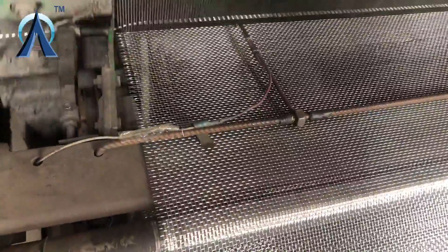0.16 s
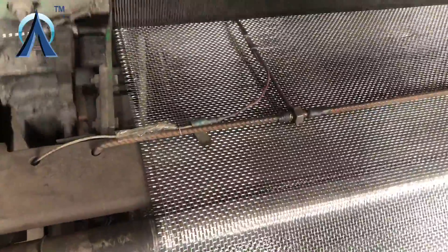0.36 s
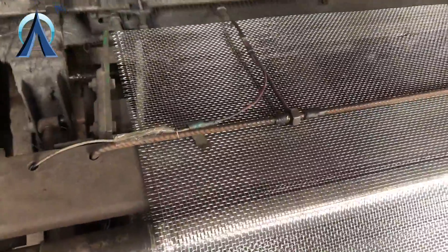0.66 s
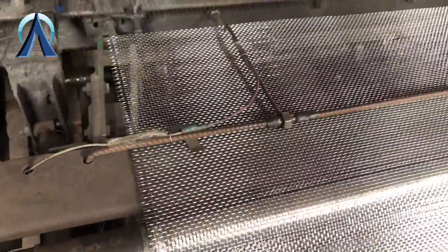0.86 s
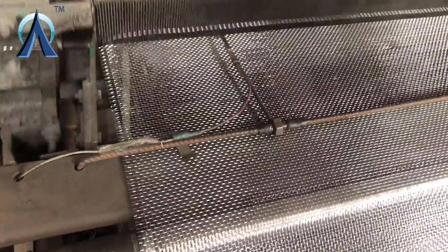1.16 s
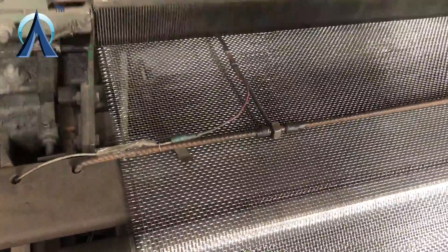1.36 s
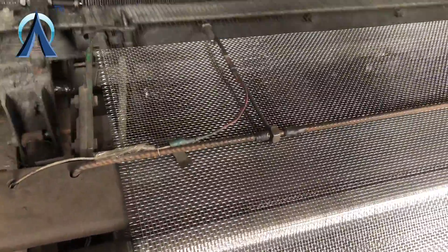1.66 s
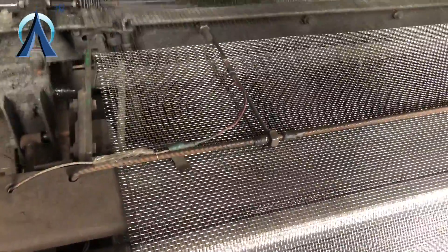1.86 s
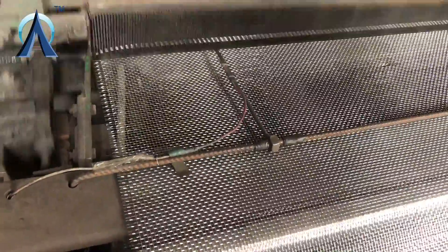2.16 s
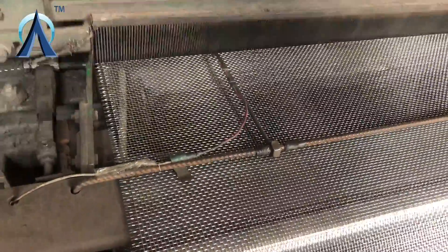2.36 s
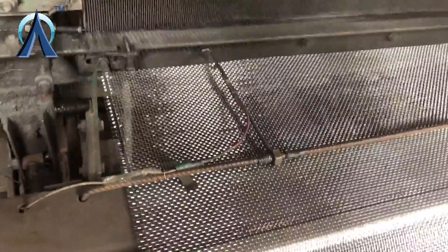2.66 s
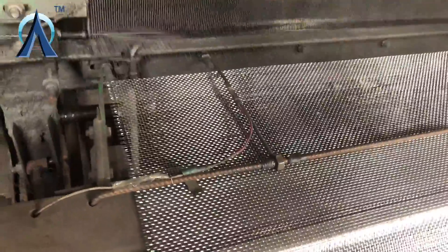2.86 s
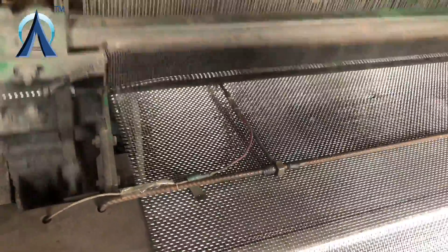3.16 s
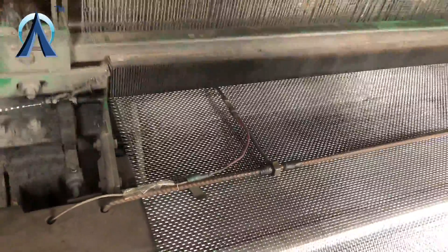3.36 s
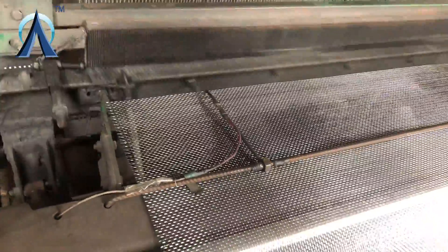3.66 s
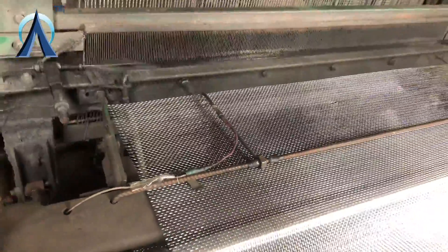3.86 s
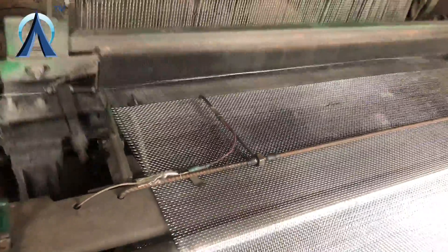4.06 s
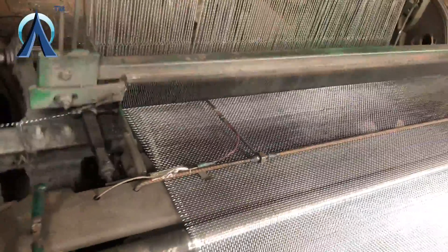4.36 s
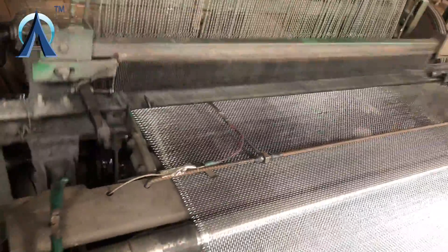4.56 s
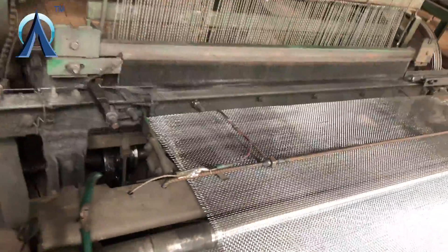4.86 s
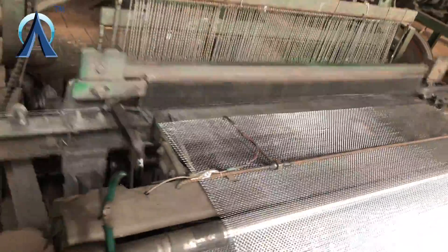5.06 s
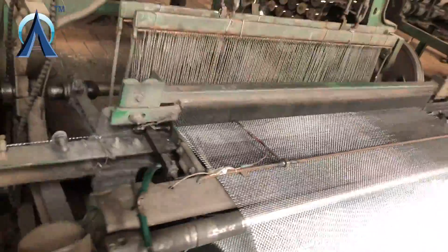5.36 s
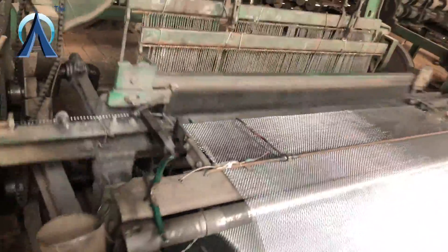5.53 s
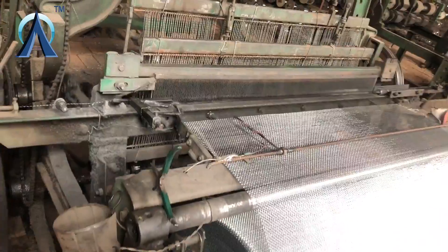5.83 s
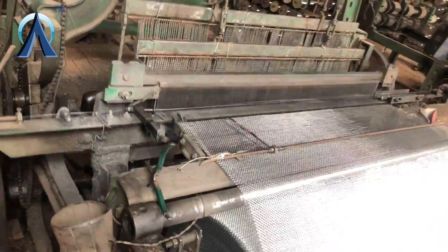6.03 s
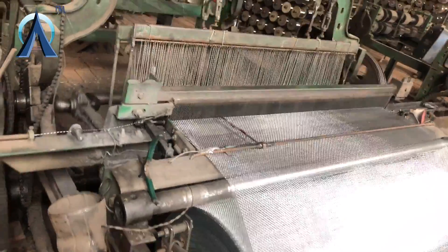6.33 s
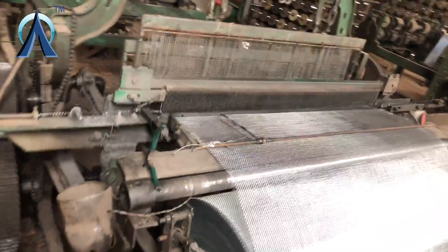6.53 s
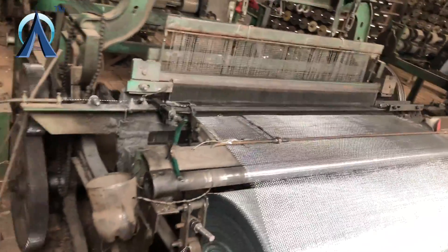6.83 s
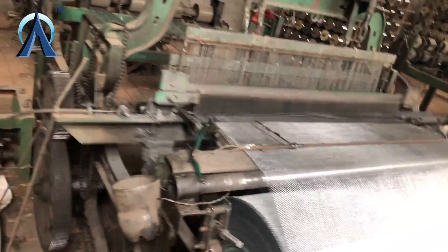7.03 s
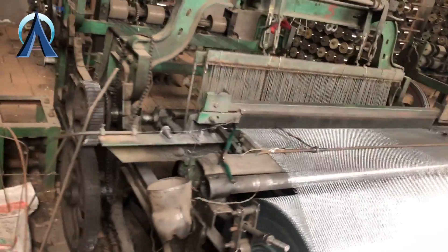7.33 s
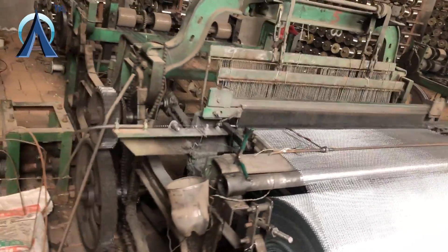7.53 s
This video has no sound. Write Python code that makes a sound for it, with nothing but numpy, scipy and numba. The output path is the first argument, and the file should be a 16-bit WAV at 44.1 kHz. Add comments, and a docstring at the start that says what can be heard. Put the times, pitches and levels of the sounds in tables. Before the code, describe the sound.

Sharp metallic clacks, chirps and a knocking beat repeat each second above gear rattle and wire rustle, softening as the microphone draws back.

```python
"""Wire mesh loom at close range

In a workshop of rumbling machines, a loom weaves about one pick a second in front of the microphone.
Decaying modes make the reed beat and small steel rings; shaped noise makes the clacks of the linkage.
Random ticks and noise make gear rattle and wire rustle; unsteady tones and pulses chirp and scrape.
The microphone moves back from the cloth, and a fast limiter ducks under the sharpest hits."""
import sys
import numpy as np
from scipy import signal
from scipy.fft import rfft, irfft
from scipy.io import wavfile
from scipy.ndimage import uniform_filter1d
from numba import njit

SR = 44100
rng = np.random.default_rng(int(sys.argv[2]) if len(sys.argv) > 2 else 0)


def store_pcm(level_fs):
    """Save levels as 16-bit WAV."""
    pcm = np.round(np.clip(level_fs, -1, 1) * 32767).astype(np.int16)
    wavfile.write(sys.argv[1], SR, np.atleast_2d(pcm).T)


N = 339129
T = np.arange(N) / SR
TURN_S, FIRST_TURN_S = 1.01, 0.2505


def undb(db):
    """Decibels to amplitude gain."""
    return 10 ** (np.asarray(db) / 20)


def unit(x):
    """Scale to rms 1."""
    return x / np.sqrt(np.mean(x ** 2) + 1e-18)


def fade(t, t60):
    """Free decay, 60 dB down after t60 seconds (at least 4 ms)."""
    return np.exp(-np.log(1000) * t / np.maximum(t60, 0.004))


def add(out, s, sound):
    """Mix a sound in at time s."""
    i = max(int(s * SR), 0)
    out[i:i + len(sound)] += sound[:max(N - i, 0)]


def walk(rate):
    """Smooth random curve of spread 1, with about `rate` new values a second."""
    k = max(int(SR / rate), 2)
    steps = np.repeat(rng.standard_normal(N // k + 1), k)
    return unit(uniform_filter1d(steps, k)[:N])


def colour(x, points):
    """Causal (minimum-phase) filter with the given outline of (pitch_hz, level_db)."""
    size = 4096
    hz, db = np.transpose(points)
    outline = np.interp(np.log(np.fft.rfftfreq(size, 1 / SR) + 1), np.log(hz), db)
    # folding the cepstrum onto positive time makes the filter causal
    cepstrum = irfft(np.log(undb(outline)))
    cepstrum[1:size // 2] *= 2
    cepstrum[size // 2 + 1:] = 0
    impulse = irfft(np.exp(rfft(cepstrum)))
    return signal.fftconvolve(x, impulse)[:len(x)]


def ring(modes, length, detune):
    """Sum of decaying modes (pitch_hz, level_db, t60_s), each slightly detuned at every blow."""
    t = T[:int(length * SR)]
    out = np.zeros(len(t))
    for hz, db, t60 in modes:
        pitch = hz * (1 + detune * rng.standard_normal())
        out += undb(db) * fade(t, t60) * np.sin(2 * np.pi * pitch * t)
    return out


def struck(blows, modes, gain_db, detune):
    """One object rung by a list of blows (start_s, level_db)."""
    out = np.zeros(N)
    for s, db in blows:
        add(out, s, undb(db + gain_db) * ring(modes, length=1 / 2, detune=detune))
    return out


def steel(low_hz, high_hz, t60, length, count):
    """Ring of a small steel part: modes scattered over a band, a few of them strong."""
    t = T[:int(length * SR)]
    hz = rng.uniform(low_hz, high_hz, (count, 1))
    phase = rng.uniform(0, 2 * np.pi, (count, 1))
    strength = unit(rng.exponential(size=(count, 1)))
    modes = strength * np.sin(2 * np.pi * hz * t + phase)
    return np.sqrt(2 / count) * modes.sum(axis=0) * fade(t, t60)


def rattle(rate, spread_db, low_hz, high_hz, t60, count):
    """Many loose parts, each ticking at random with its own ring; `rate` is all ticks per second."""
    out = np.zeros(N)
    for _ in range(count):
        part = steel(low_hz, high_hz, t60, length=1 / 20, count=24)
        when, size = rng.random(size=(4000, 2))[:int(rate * N / SR / count)].T
        strength = undb(-spread_db * np.log(size + 0.019))  # a few ticks are strong
        taps = np.bincount((when * N).astype(int), strength, N)
        out += signal.oaconvolve(taps, part)[:N]
    return unit(out)


def turn_start(k):
    """Time at which turn k begins."""
    return FIRST_TURN_S + k * TURN_S


def every_turn(rows):
    """Repeat the rows of one turn, from the part-turn already under way at the start."""
    repeats = [(turn_start(k) + lag, *rest) for k in range(-1, len(TURNS)) for lag, *rest in rows]
    return [row for row in repeats if 0 <= row[0] < N / SR]


def cyclic(points):
    """The columns of a one-turn curve, repeated through time."""
    lag, *columns = np.transpose(points)
    return [np.interp(T - FIRST_TURN_S, lag, column, period=TURN_S) for column in columns]


# microphone distance from the cloth: start_s [s], distance [0 close to 1 far]
DISTANCE = [(0, 0.078), (3.2, 0.084), (4.4, 0.27), (5.6, 0.4), (7.69, 1)]


def afar(s):
    """How far the microphone has moved back at time s, 0 to 1."""
    return np.clip(np.interp(s, *np.transpose(DISTANCE)), 0, 1)


# spectrum of the other machines: pitch_hz [Hz], level_db [relative dB per Hz]
SHOP_SPECTRUM = [(13, -28), (22, -22), (69, -6.5), (204, -1), (252, -4.5), (322, 2.5), (380, 1), (591, 0),
                 (652, 0.5), (743, 1), (875, -4.5), (1100, -3.5), (1430, -45), (2420, -120)]


def workshop():
    """Other machines: coloured noise and dull random ticks, swelling a little."""
    clatter = rattle(rate=260, spread_db=4.5, low_hz=156.0, high_hz=1274, t60=0.059, count=16)
    rumble = colour(rng.standard_normal(N) + undb(-13.5) * clatter, SHOP_SPECTRUM)
    return unit(rumble) * undb(-34.85 + 0.43 * walk(7.4))


# steady drive tones: pitch_hz [Hz, mean], level_db [dB, mean]
DRIVE_TONES = [(700, -53), (764, -57.5)]


def drive_whine():
    """Faint whine of drives: sine tones with a slight waver in pitch and strength."""
    out = np.zeros(N)
    for hz, db in DRIVE_TONES:
        pitch = hz * (1 + 0.00398 * walk(13))
        tone = unit(np.sin(2 * np.pi * np.cumsum(pitch) / SR))
        out += undb(db + 2 * walk(5.6)) * tone
    return out


# gear load through one turn: start_s [s into the turn], level_db [relative dB]
GEAR_LOAD = [(.012, -27), (.06, -31), (.14, -27.5), (.22, -27.5), (.31, -29), (.40, -30.5), (.49, -27),
             (.55, -31), (.572, -24), (.592, -30), (.66, -27.5), (.77, -29), (.89, -29.5), (.94, -29),
             (.985, -29)]
# slow change of the rattle: start_s [s], level_db [dB change]
GEAR_SWELL = [(0, -2.5), (.6, 1.5), (1.05, -1.5), (1.6, .5), (2.1, -2), (2.7, 0.2), (3.5, 0), (4.2, -0.5),
              (5.1, 1), (5.9, -1), (6.6, 0), (7.69, -1)]
# spectrum of the gearing: pitch_hz [Hz], level_db [relative dB per Hz]
GEAR_SPECTRUM = [(400, -24.5), (750, -8.5), (1000, -6.5), (1250, -2), (1500, -2.5), (1850, -0.5),
                 (2500, -2.5), (3200, -9.5), (5000, -30.5)]


def gearing():
    """Gears rattle with the load: many ringing ticks and noise, swelling through each turn."""
    level = cyclic(GEAR_LOAD)[0] + np.interp(T, *np.transpose(GEAR_SWELL)) + 0.64 * walk(20)
    ticks = rattle(rate=380, spread_db=1, low_hz=399.7, high_hz=4493, t60=0.1, count=40)
    gears = ticks + 0.87 * rng.standard_normal(N)
    return unit(colour(gears, GEAR_SPECTRUM)) * undb(level + 1.0)


# wire rub through one turn: start_s [s into the turn], rustle_db, hiss_close_db, hiss_afar_db [relative dB]
WARP_RUB = [(.02, -25, -30, -28.5), (.10, -30.5, -31, -35), (.15, -28, -27.5, -39), (.235, -28, -31.5, -33),
            (.29, -25, -23.5, -32), (.34, -27.5, -30.5, -31.5), (.41, -30, -31.5, -28),
            (.465, -27, -27, -28), (.555, -31, -33, -31.5), (.59, -28, -24.5, -34),
            (.65, -28.5, -30, -27.5), (.72, -29.5, -28.5, -30.5), (.79, -28, -26, -29.5),
            (.895, -30, -28, -32.5), (.93, -23.5, -19.5, -24.5), (.985, -27, -32, -24.5)]
# spectra of the two layers: pitch_hz [Hz], level_db [relative dB per Hz]
RUSTLE_SPECTRUM = [(1500, -0.5), (2500, -4), (3200, 0), (4200, 1.5), (5200, -1), (6700, -1), (8200, -10),
                   (11000, -28.5)]
HISS_SPECTRUM = [(5500, -23), (7500, -0.5), (8700, -0.5), (9500, 3.5), (10600, 2.5), (11700, 2), (13000, 2),
                 (14200, 3), (15300, 3.5), (16000, 3.5)]


def warp_wires():
    """Steel warp wires rub as the shed opens and closes: ringing ticks and noise, coloured twice."""
    rustle, hiss_close, hiss_far = cyclic(WARP_RUB)
    hiss = hiss_close + (hiss_far - hiss_close) * afar(T)
    tension = 1.4 * walk(14)  # no two turns pull the wires alike
    jostle = walk(120)  # the wires catch and slip together
    ticks = rattle(rate=750, spread_db=3.5, low_hz=1806, high_hz=15860, t60=0.065, count=64)
    wires = ticks + 0.99 * rng.standard_normal(N)
    rustle_gain = undb(rustle + tension + 0.79 * jostle)
    hiss_gain = undb(hiss + tension + 2.0 + 0.68 * jostle + 0.2 * walk(180))
    return unit(colour(wires, RUSTLE_SPECTRUM)) * rustle_gain + unit(colour(wires, HISS_SPECTRUM)) * hiss_gain


# loose rods and wire ends: start_s [s], pitch_hz [Hz], level_db [relative dB], t60_s [s]
ROD_TINKLES = [(.535, 3649, -25, .2), (1.99, 9900, -29, .21), (2.02, 7330, -27.5, .2),
               (2.66, 2760, -26, 0.16), (3.549, 2400, -29, 0.17), (3.755, 2780, -28, .26),
               (4.04, 5700, -30, .16), (4.04, 8850, -26, 0.13), (4.47, 2920, -25.5, 0.25),
               (5.94, 2780, -25, .11), (6.001, 2820, -25, .1), (6.052, 2770, -27, .12),
               (6.115, 2804, -25, .084), (6.465, 2347, -30, .2), (6.785, 6370, -24, .15),
               (6.908, 2804, -21, 0.46), (7.18, 2756, -28, 0.13)]


def tinkles():
    """Each thin rod or wire end rings with one decaying mode."""
    out = np.zeros(N)
    for s, hz, db, t60 in ROD_TINKLES:
        add(out, s, ring([(hz, db + 2.0, t60)], length=1 / 2, detune=0.00019))
    return out


# a flicked wire end: start_s [s], level_db [relative dB]
WIRE_FLICKS = [(3.330, -16)]
# its modes: pitch_hz [Hz], level_db [relative dB], t60_s [s]
WIRE_END_MODES = [(3750, -4.5, 0.088), (6420, -2, 0.069), (6965, -9, .08), (9990, -4.5, 0.13),
                  (10841, -13, .08), (14850, -2, .14), (15600, -9, .1)]


def wire_flicks():
    """A flicked wire end rings in its own modes."""
    return struck(WIRE_FLICKS, WIRE_END_MODES, gain_db=2.5, detune=0.0003)


# blows on a steel bar: start_s [s], level_db [relative dB]
BAR_BLOWS = [(5.501, -10), (6.465, -43)]
# its modes: pitch_hz [Hz], level_db [relative dB], t60_s [s]
BAR_MODES = [(1800, -11, 0.18), (2255, -22, 0.16), (2347, 1.5, 0.39), (2230, -22, .25), (2890, -8, 0.11),
             (3630, -11, .22)]


def bar_clangs():
    """A struck steel bar rings in its own modes."""
    return struck(BAR_BLOWS, BAR_MODES, gain_db=-2.5, detune=0.0003)


# chirp and scrape, turn by turn (scrapes() reads it too):
# chirp_db [relative dB], scrape_start_s [s into the turn], scrape_length_s [s], scrape_db [relative dB]
TURNS = [(-14.5, .045, 0.19, -21), (-15.5, .12, 0.032, -22), (-15, .122, 0.076, -19), (-45, 0.14, .05, -30),
         (-21, .072, 0.021, -16.5), (-27, 0.04, 0.035, -19), (-23.5, 0.14, .05, -35), (-25, 0.13, .05, -39)]
# a dry bearing chirps twice after the beat:
# start_s [s into the turn], length_s [s], pitch_hz [Hz, mean], level_db [relative dB]
BEARING_CHIRPS = [(0.038, 0.023, 7970, -2), (0.054, .017, 7240, -9)]
# wire sings in its guides: start_s [s], length_s [s], pitch_hz [Hz, mean], level_db [relative dB]
WIRE_SINGING = [(1.385, .07, 13300, -32), (2.630, .14, 12200, -29), (3.645, .029, 12015, -25),
                (3.740, 0.16, 11778, -31), (4.945, .1, 11700, -27), (5.950, .42, 12000, -39),
                (7.290, 0.16, 11800, -29)]


def squeaks():
    """Bearing and wire guides: short stick-slip tones with an unsteady pitch and strength."""
    out, drift, grip = np.zeros(N), walk(330), undb(3.5 * walk(300))
    tones = list(WIRE_SINGING)
    for k, (chirp_db, *_) in enumerate(TURNS):
        for lag, length, hz, db in BEARING_CHIRPS:
            tones.append((turn_start(k) + lag, length, hz, chirp_db + db))
    for s, length, hz, db in tones:
        span = slice(int(s * SR), min(int((s + length) * SR), N))
        tone = np.sin(2 * np.pi * np.cumsum(hz * (1 + 0.0074 * drift[span])) / SR)
        shape = grip[span] * signal.windows.tukey(len(tone), 0.6)
        add(out, s, undb(db - 4.0) * unit(tone * shape))
    return out


# a small latch snaps with four of the strokes: start_s [s into the turn], level_db [relative dB, close]
LATCH_SNAPS = [(.003, -13), (.204, -17), (.584, -3), (.679, -11)]
# its modes: pitch_hz [Hz], level_db [relative dB], t60_s [s]
LATCH_MODES = [(3730, -29, .05), (4020, -43, .04), (11400, -5.5, 0.027), (11720, -20, .04),
               (14600, -20, .06)]


def latch():
    """A small latch rings in its own modes and is soon lost as the microphone moves back."""
    snaps = [(s, db - 31 * afar(s)) for s, db in every_turn(LATCH_SNAPS)]
    return struck(snaps, LATCH_MODES, gain_db=7.0, detune=0.0026)


def scrapes():
    """As the reed draws back, uneven stick-slip pulses ring a narrow resonance of the slide."""
    out = np.zeros(N)
    slide_hz, slips_hz, t60 = 1776, 259, 0.01
    modes = [(slide_hz, 0, t60), (2.06 * slide_hz, -7, t60)]
    for k, (_, lag, length, db) in enumerate(TURNS):
        n = int(length * SR)
        phase = np.cumsum(slips_hz * undb(5.3 * walk(200)[:n])) / SR
        slips = np.diff(np.floor(phase), prepend=0) * signal.windows.tukey(n, 0.4)  # one pulse a cycle
        sound = signal.fftconvolve(slips, ring(modes, length=1 / 20, detune=0.0041))
        add(out, turn_start(k) + lag, undb(db - 6.5) * sound / (np.std(sound[:n]) + 1e-9))
    return out


# linkage blows, same order every turn: start_s [s into the turn], body_db, edge_db, sizzle_db [relative dB],
# pitch_hz [Hz, ring], ring_db [relative dB], afar_db [dB change at the far position]
LINKAGE_STROKES = [(.001, -19, -22, -15, 4030, -29, -17), (.2012, -18, -22.5, -22.5, 3920, -24.5, -5),
                   (.2585, -27, -15.5, -20.5, 4570, -21.5, -15),
                   (.3155, -21, -21, -18.5, 2480, -26.5, -7.5), (.3635, -36, -27, -19.5, 9660, -28.5, -6),
                   (.568, -24, -21.5, -16, 2070, -35, -2.5), (.5835, -26, -23.5, -11.5, 6480, -21, -4),
                   (.596, -47, -19.5, -15.5, 10900, -24, -16), (.677, -22, -22.5, -27, 3900, -30, -6),
                   (.707, -28, -27.5, -29.5, 2830, -27.5, -1.5), (.91, -21, -17.5, -13, 9400, -20, -5),
                   (.94, -22.5, -23, -19.5, 2500, -32, 2)]
# a part with play knocks hard, on a stroke or between two: start_s [s], level_db [relative dB], pitch_hz [Hz]
HARD_KNOCKS = [(1.543, -17, 2070), (1.575, -18, 6300), (1.963, -26, 2880), (2.435, -24, 2670),
               (2.527, -27, 4660), (2.984, -26, 2820), (3.018, -21, 2640), (3.329, -24, 14740),
               (4.222, -17, 2430), (4.458, -23.5, 3650), (4.565, -18, 10780), (5.213, -28, 2080),
               (5.503, -29, 2410), (5.569, -27.5, 2440), (5.967, -24, 3950), (6.001, -30, 2850),
               (6.139, -24, 2400), (6.57, -23.5, 4580), (6.21, -18, 4020), (7.648, -9, 3890)]
# colour of the knocks: body_db, edge_db, sizzle_db, ring_db [dB added to the knock level]
KNOCK_BALANCE = (3, -3.5, -3.5, -6)


def linkage():
    """Steel blows as (s, Hz, four levels): strokes, never quite alike, and the hard knocks."""
    play_s, force_scatter_db, ring_scatter = 0.0006, 1.1, 0.0045
    blows = []
    for s, body, edge, sizzle, hz, db, afar_db in every_turn(LINKAGE_STROKES):
        late, force, detune = rng.standard_normal(3)
        levels = np.array([body, edge, sizzle, db]) + afar_db * afar(s) + force_scatter_db * force
        blows.append((s + play_s * late, hz * (1 + ring_scatter * detune), levels))
    return blows + [(s, hz, db + np.array(KNOCK_BALANCE)) for s, db, hz in HARD_KNOCKS]


def clacks():
    """Levers and heald frames: noise that cracks, bounces within milliseconds and leaves a short ring."""
    crack_t60, tail_t60, ring_t60 = 0.013, 0.04, 0.038
    out, t = np.zeros(N), T[:SR // 8]
    first = slice(SR // 125)  # levels are set over the first 8 ms
    contact = 1 - np.exp(-t / 0.00041)
    # each noise level is spread over the width of its band
    band_db = 10 * np.log10(np.array([2000, 4500, 8000]) / (SR / 2))
    for s, hz, levels in linkage():
        body, edge, sizzle, ring_db = levels + np.array([-3.5, 0.0, -0.5, 2.0])
        power = fade(t, crack_t60) ** 2 + (undb(11.0) * fade(t, tail_t60)) ** 2
        lags = np.cumsum(rng.uniform(0.18, 1, size=3)) * 0.0033
        for lag, bounce_db in zip(lags, (-8.5, -9, -9.5)):
            power += (undb(bounce_db) * fade(np.abs(t - lag), crack_t60) * (t > lag)) ** 2
        crack = np.sqrt(power) * contact * rng.standard_normal(len(t))
        low, mid, top = np.array([body, edge, sizzle]) - band_db
        outline = [(400, low - 18), (1400, low - 3), (2500, low), (4000, mid + 1),
                   (7000, mid - 1), (10000, top), (13200, top - 3), (15300, top + 2)]
        add(out, s, colour(crack / np.std(crack[first]), outline))
        tone = contact * fade(t, ring_t60) * np.sin(2 * np.pi * hz * t)
        add(out, s, undb(ring_db) * tone / np.std(tone[first]))
    return out


# modes of the reed and its beam: pitch_hz [Hz], level_db [relative dB], t60_s [s]
REED_MODES = [(586, -9.5, 0.21), (716, -16, .16), (747, -2.5, 0.11), (1195, -3, 0.041), (1220, -2, 0.15),
              (1317, -4, 0.13), (1370, -8, 0.24), (1550, -16, 0.16), (1810, -24, .1), (2050, -30, 0.06)]
# how hard the reed beats the weft home, turn by turn: level_db [relative dB]
BEAT_LEVELS = [-19, -18.5, -19, -18.5, -16.5, -17.5, -20.5, -22.5]


def reed_beats():
    """Once a turn the reed knocks the weft home, and reed and beam ring in their modes."""
    beats = [(turn_start(k) + 0.00403, db) for k, db in enumerate(BEAT_LEVELS)]
    return struck(beats, REED_MODES, gain_db=-1.5, detune=0.004)


def room(x, wet_db, t60):
    """Dull reflections from walls and neighbouring machines: a decaying noise tail."""
    t = T[:SR // 2]
    burst = rng.standard_normal(len(t)) * fade(t, t60) * (t > 0.008)
    tail = colour(burst, [(300, -8.0), (2500, -9.5), (7000, -14.5), (15000, -29)])
    return x + undb(wet_db) * signal.fftconvolve(x, tail / np.linalg.norm(tail))[:N]


def scene():
    """Heavy blows carry into the room; small rings and squeaks are close, over loom and workshop."""
    background = workshop() + drive_whine()
    running = gearing() + warp_wires()
    small = tinkles() + wire_flicks() + bar_clangs() + squeaks() + latch()
    blows = scrapes() + clacks() + reed_beats()
    return (background + running + small + room(blows, wet_db=-16, t60=0.16))[None]


@njit
def follow(power, attack, release):
    """Envelope that rises fast and falls more slowly."""
    out, e = np.empty(len(power)), 0.
    for i in range(len(power)):
        e += (power[i] - e) * (attack if power[i] > e else release)
        out[i] = e
    return out


def limiter(x, top_db, attack_s, release_s):
    """Turns everything down for a moment when the envelope passes the ceiling."""
    envelope = follow(np.abs(x), 1 / (1 + attack_s * SR), 1 / (1 + release_s * SR))
    return x * np.minimum(1, undb(top_db) / (envelope + 1e-9))


def record(dry):
    """The microphone drops the deepest bass, a fast limiter holds the peaks, then the top is cut."""
    bottom_hz, top_hz = 53.5, 15850
    thin = signal.sosfilt(signal.butter(4, bottom_hz, "high", fs=SR, output="sos"), dry[0])
    held = limiter(thin, top_db=-6, attack_s=0.00005, release_s=0.016)
    return signal.sosfilt(signal.ellip(12, 0.1, 80, top_hz, fs=SR, output="sos"), held)[None]


dry = scene()
out = record(dry)
store_pcm(out)
```